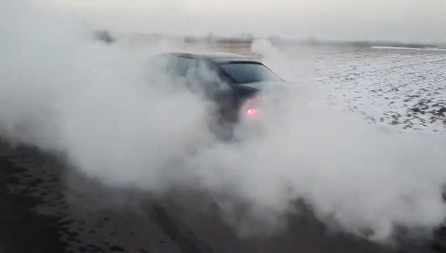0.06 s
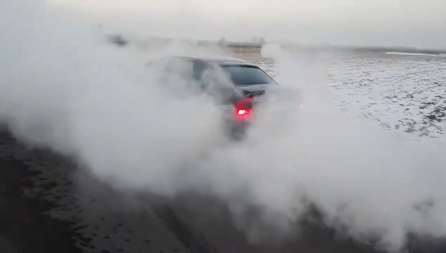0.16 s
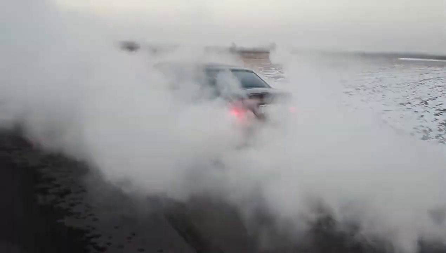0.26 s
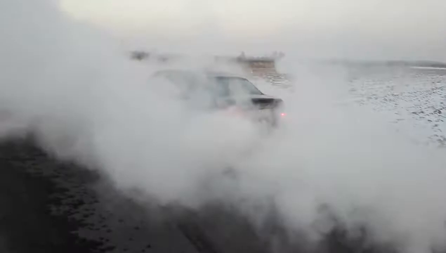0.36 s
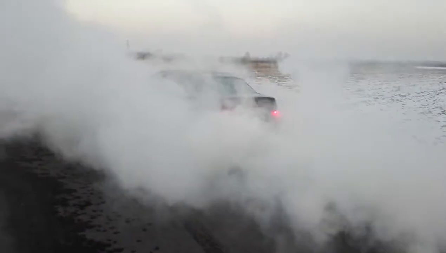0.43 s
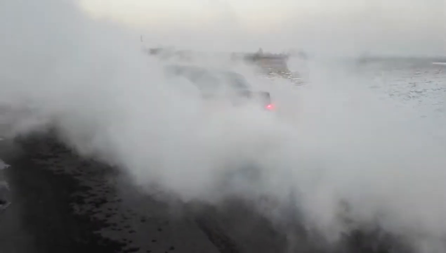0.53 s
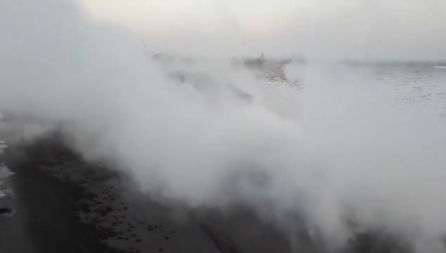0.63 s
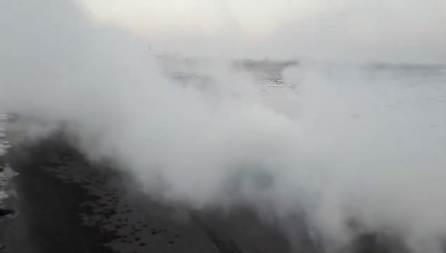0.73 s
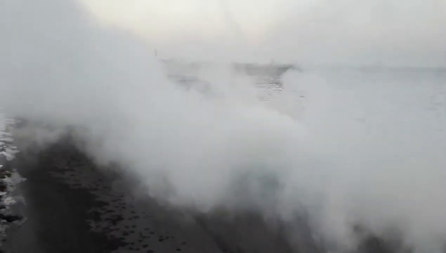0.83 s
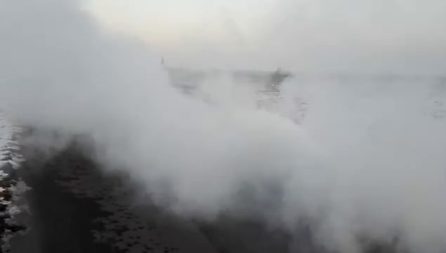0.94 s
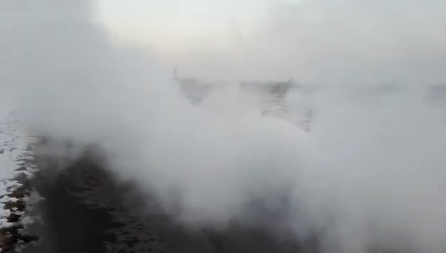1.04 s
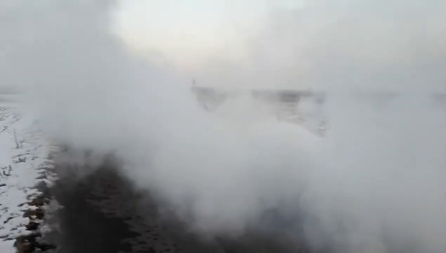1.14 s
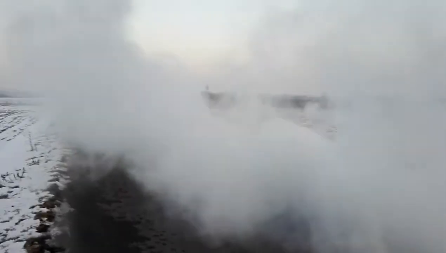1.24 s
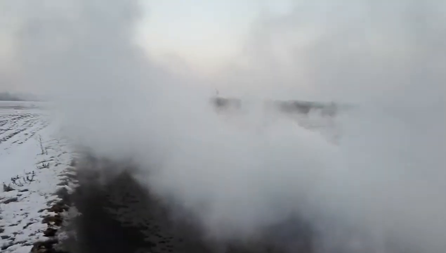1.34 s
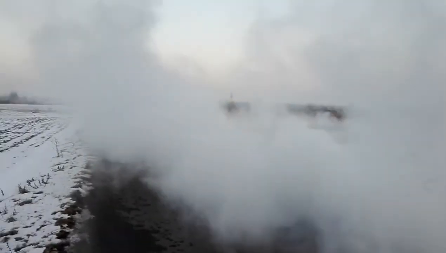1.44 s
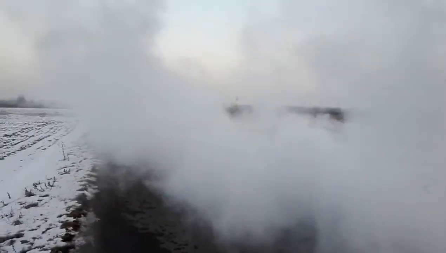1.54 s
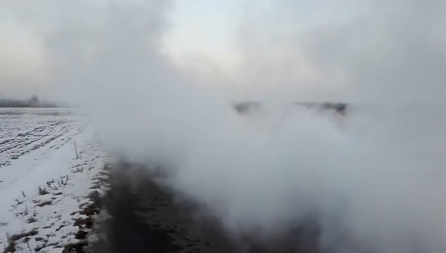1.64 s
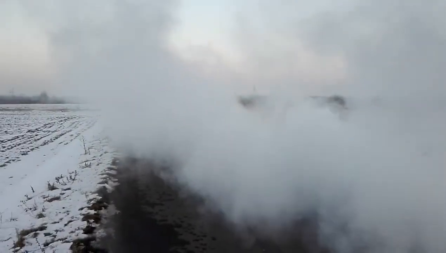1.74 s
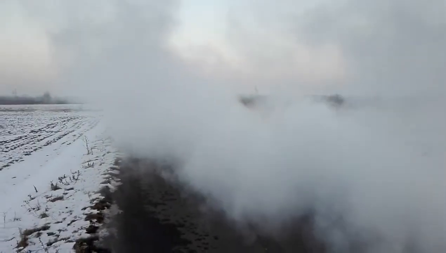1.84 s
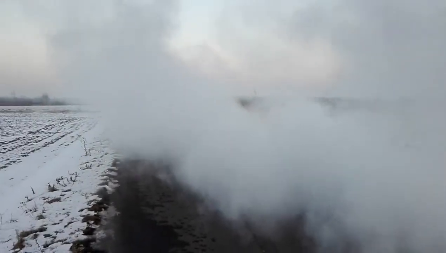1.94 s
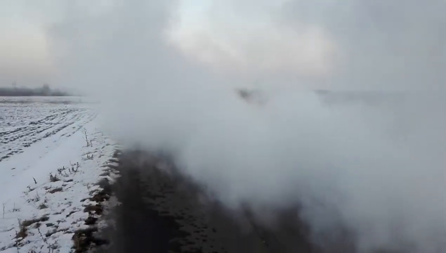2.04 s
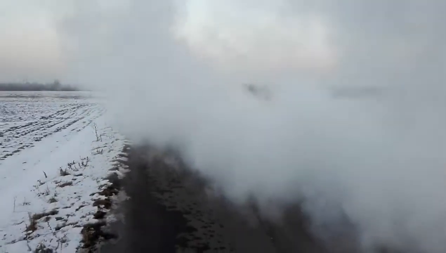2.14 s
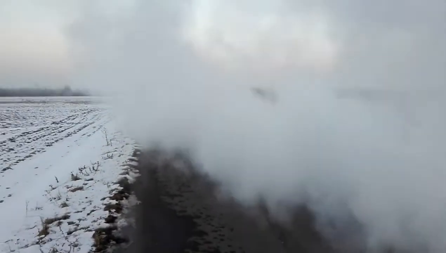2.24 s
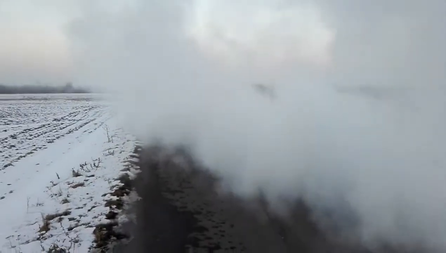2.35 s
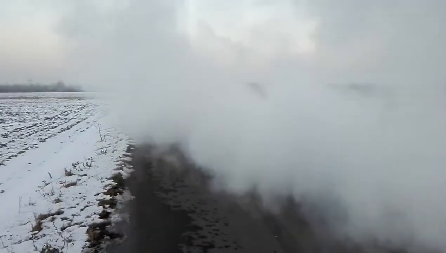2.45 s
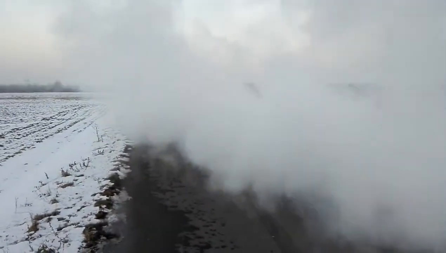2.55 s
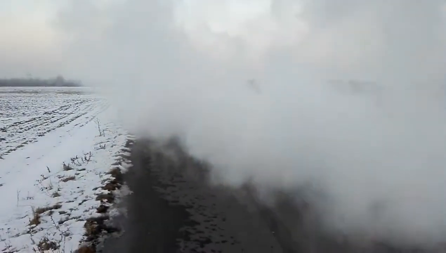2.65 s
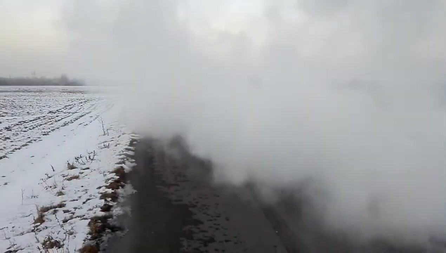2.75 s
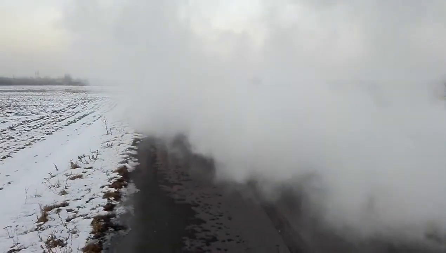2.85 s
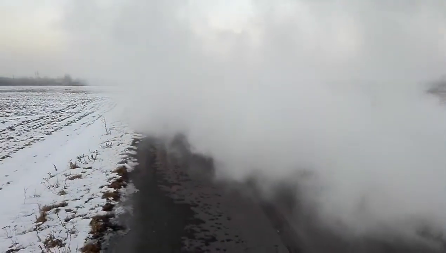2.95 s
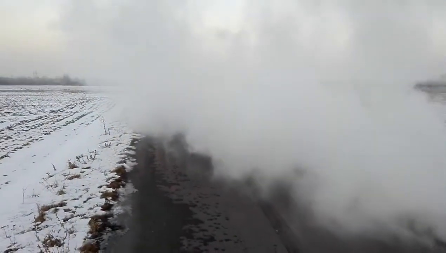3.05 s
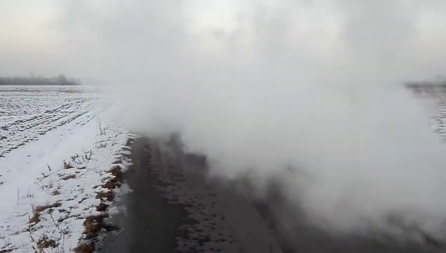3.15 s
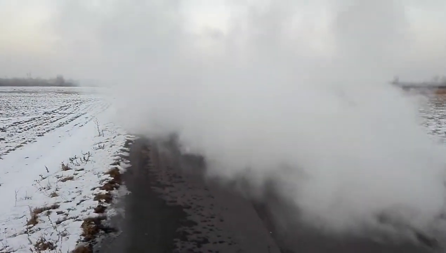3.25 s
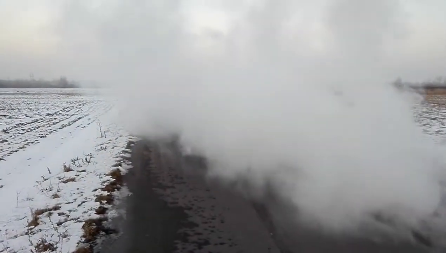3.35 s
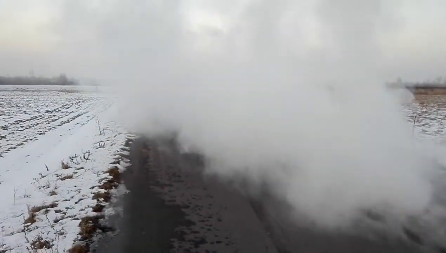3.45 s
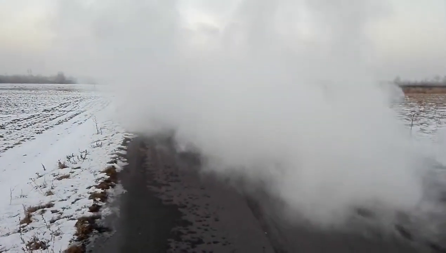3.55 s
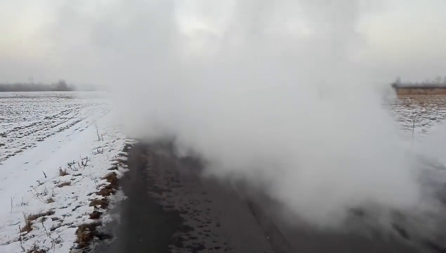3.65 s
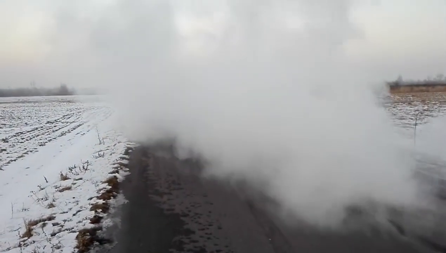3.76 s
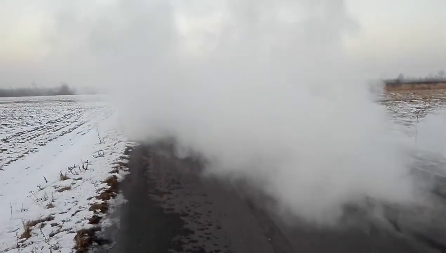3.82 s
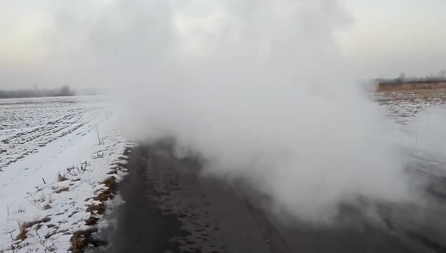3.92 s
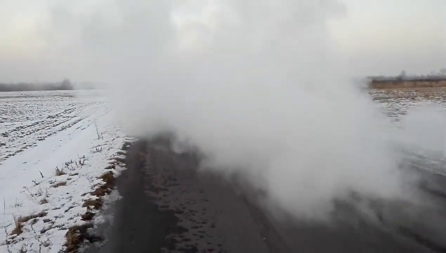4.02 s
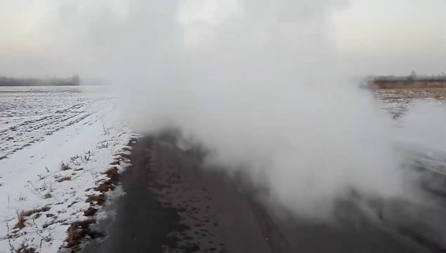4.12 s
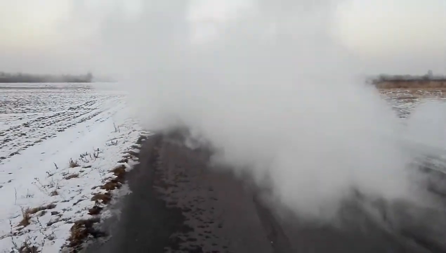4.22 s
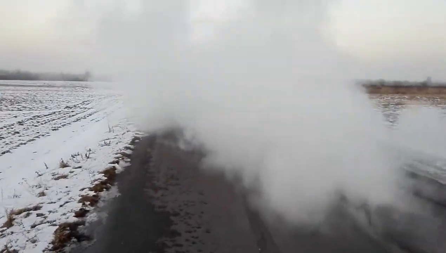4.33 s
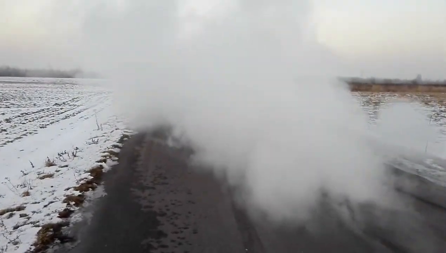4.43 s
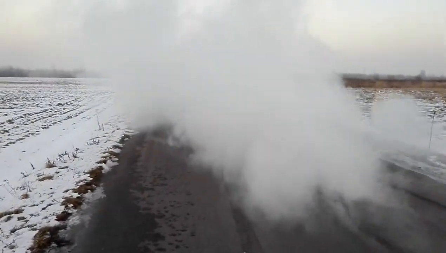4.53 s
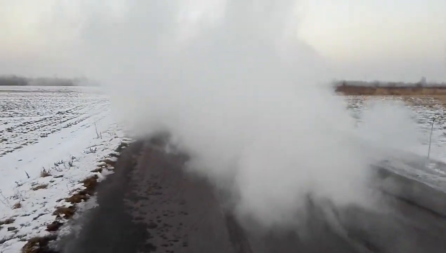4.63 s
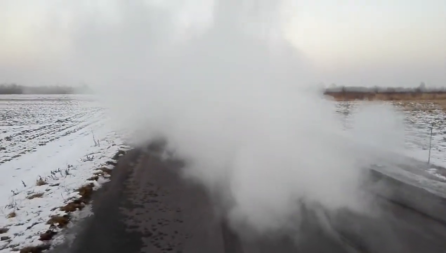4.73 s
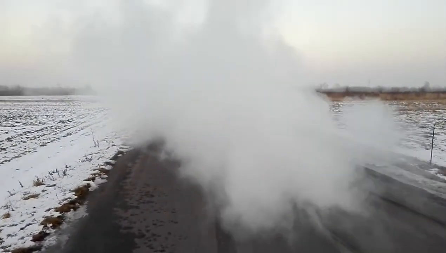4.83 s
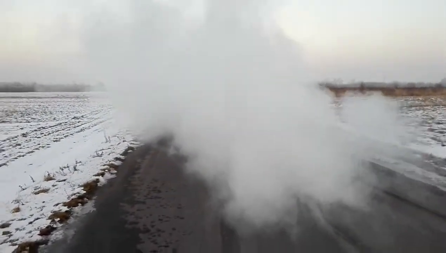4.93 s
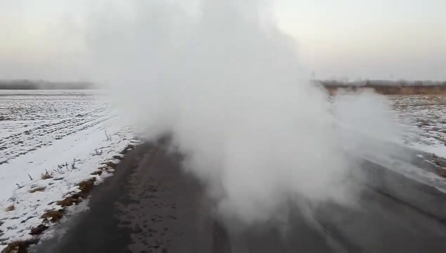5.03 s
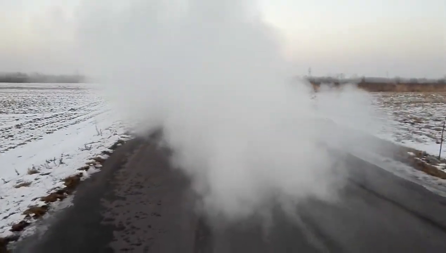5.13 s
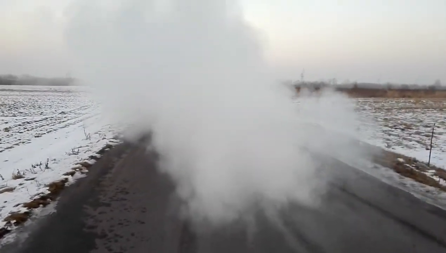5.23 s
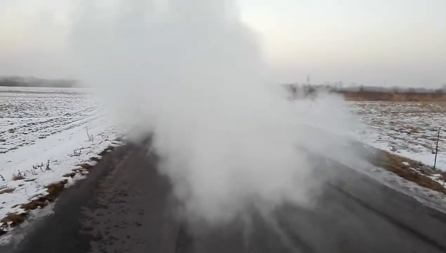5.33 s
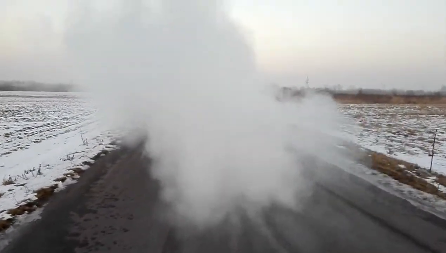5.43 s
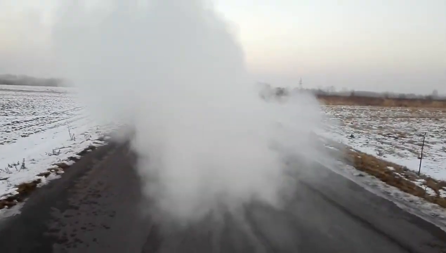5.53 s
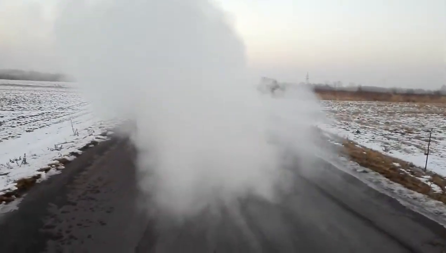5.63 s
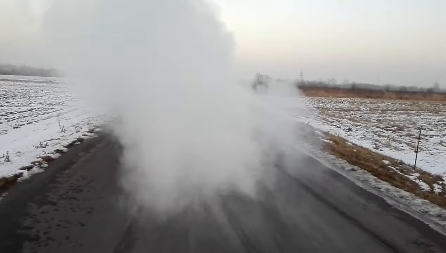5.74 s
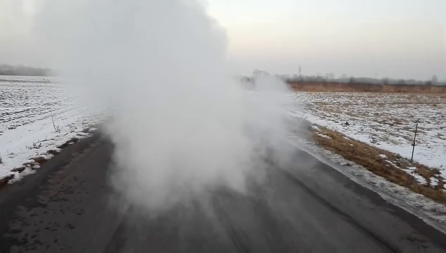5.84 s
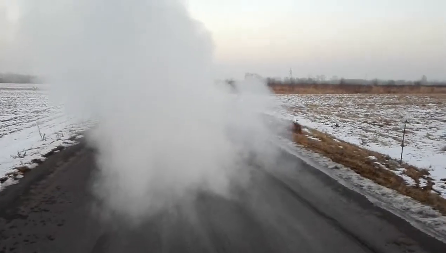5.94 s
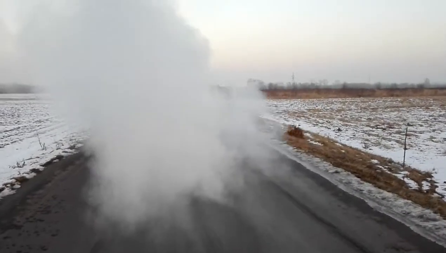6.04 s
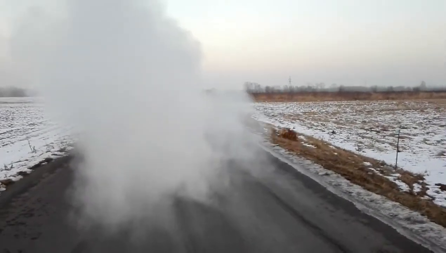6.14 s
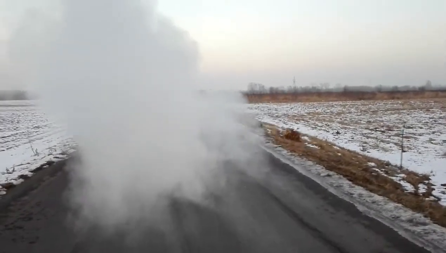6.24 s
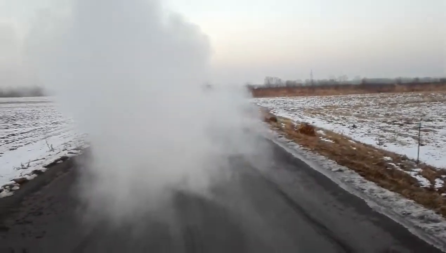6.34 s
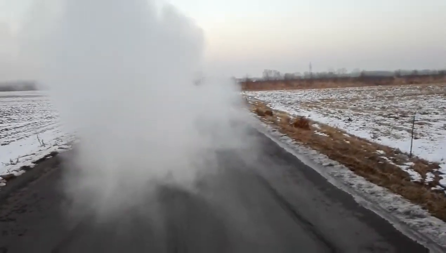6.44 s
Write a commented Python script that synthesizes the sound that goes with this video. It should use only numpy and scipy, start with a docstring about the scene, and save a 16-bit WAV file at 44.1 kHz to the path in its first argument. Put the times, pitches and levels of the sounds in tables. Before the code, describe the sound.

Spinning tyres screech and hiss over a hard-revving car engine, the throttle shuts with thumps, then a skid squeals down to a distant stop.

```python
"""Tyres screech and hiss over a loaded four-cylinder engine as a turbocharged car pulls away on a country road.
The throttle shuts: the exhaust thumps and burbles, the revs sink to idle and grit ticks on the road,
while the skidding tyres squeal and step down in pitch until the car stands, far off, and wind bumps softly.
Engine orders and a gear whine are sines locked to the firing rate; tyre notes are jittered tones in narrow noise;
rubber, rumble, gravel and open air are coloured noise, and distance lowers the car as it leaves."""
import sys
import numpy as np
from scipy import signal
from scipy.fft import rfft, irfft, next_fast_len
from scipy.io import wavfile

SR = 44100
rng = np.random.default_rng(int(sys.argv[2]) if len(sys.argv) > 2 else 0)


def digitize_waveform(pressure):
    """Quantize a signal to 16-bit integers and store it at the path in sys.argv[1].

    Rows of a 2-D input are taken as channels; values are limited to [-1, 1].
    """
    field = np.atleast_2d(pressure).T
    bounded = np.clip(field, -1, 1)
    quanta = np.round(bounded * 32767).astype(np.int16)
    wavfile.write(sys.argv[1], SR, quanta)


N = 285754

# the drive [s]: throttle eases, throttle shuts, wheels stop spinning, idle takes over, car stands
EASE_S, LIFT_S, GRIP_S, IDLE_S, STOP_S = 0.96, 1.92, 2.42, 4.85, 5.15
START_M, TOP_SPEED_M_PER_S = 3.9, 7.35

# engine speed: (time [s], firing rate [firings per s])
FIRING_RATE = [(0.0, 200), (0.16, 196.7), (0.85, 193), (1.04, 189), (1.84, 177.7), (2.18, 152.4),
               (2.65, 133.5), (3.21, 105.4), (3.61, 89.4), (4.06, 63), (4.75, 39), (5.03, 37), (5.54, 37.4),
               (6.48, 40.4)]


def from_db(db):
    """Decibels to gain."""
    return 10 ** (np.asarray(db) / 20)


def rms_one(x):
    """Scale to unit rms."""
    return x / np.sqrt(np.mean(np.abs(x) ** 2) + 1e-20)


def in_time(rows):
    """Each column of a curve, sample by sample."""
    s, *columns = np.transpose(rows)
    return [np.interp(np.arange(N) / SR, s, c) for c in columns]


def during(rows):
    """One while a curve lasts, with 50 ms fades outside it."""
    first_s, last_s = rows[0][0], rows[-1][0]
    return np.interp(np.arange(N) / SR, [first_s - .05, first_s, last_s, last_s + .05], [0, 1, 1, 0])


def after(s, over_s):
    """Rises from 0 to 1 in a straight line centred on a moment."""
    return np.clip((np.arange(N) / SR - s) / over_s + .5, 0, 1)


def swells(rows, attack_s, release_s):
    """Gain of events (start, length, level, ...): each rises, holds and dies away."""
    t = np.arange(N) / SR
    gain = np.zeros(N)
    for s, length, db, *_ in rows:
        release = np.exp(-np.maximum(t - s - length, 0) / release_s)
        gain += from_db(db) * after(s, attack_s) * release
    return gain


def at_hz(points, hz):
    """Read a spectrum on a log-frequency axis."""
    f, value = np.transpose(points)
    return np.interp(np.log(hz + 1e-3), np.log(f), value)


def turning(hz):
    """Phase of something that repeats hz times a second."""
    return 2 * np.pi * np.cumsum(hz) / SR


def drift(rate):
    """Smooth random wander of rms 1: noise low-passed around rate [Hz]."""
    # made at an eighth of the sample rate, then interpolated
    size = next_fast_len(N // 8 + 2)
    hz = np.fft.rfftfreq(size, 8 / SR)
    slow = irfft(rfft(rng.standard_normal(size)) / (1 + (hz / rate) ** 2), size)
    return np.interp(np.arange(N) / 8, np.arange(size), rms_one(slow))


def coloured(x, spectrum):
    """Give a signal a colour that falls steeply past its ends; rms 1."""
    hz = np.fft.rfftfreq(N, 1 / SR)
    low_hz, high_hz = spectrum[0][0], spectrum[-1][0]
    ends = 1 / (1 + (hz / high_hz) ** 8) * (1 - 1 / (1 + (hz / low_hz) ** 8))
    return rms_one(irfft(rfft(x) * ends * from_db(at_hz(spectrum, hz)), N))


def noise(spectrum):
    """Coloured stereo noise whose two sides differ only in the treble; rms 1."""
    # left-right likeness: (frequency [Hz], correlation [share])
    likeness = [(3000, 1.0), (5000, .95), (8000, .72), (12000, .6)]
    alike = np.clip(at_hz(likeness, np.fft.rfftfreq(N, 1 / SR)), 0, 1)
    mid, side = rfft(rng.standard_normal((2, N)))
    stereo = np.sqrt(1 + alike) * mid + np.sqrt(1 - alike) * side * [[1], [-1]]
    return coloured(irfft(stereo, N), spectrum)


def narrow_noise(centre_hz, width_hz):
    """Noise in a narrow band around a moving pitch, from two drifting quadrature carriers; rms near 1."""
    centre = turning(centre_hz)
    return drift(width_hz) * np.cos(centre) + drift(width_hz) * np.sin(centre)


def band(x, low_hz, high_hz):
    """Second-order band-pass."""
    edges_hz = [low_hz, min(high_hz, SR / 2 - 100)]
    return signal.sosfilt(signal.butter(2, edges_hz, "band", fs=SR, output="sos"), x)


def speed():
    """Share of top speed: the car gains until the throttle shuts, then slows to a stand."""
    return np.interp(np.arange(N) / SR, [0, LIFT_S, STOP_S], [0, 1, 0])


def nearness():
    """Gain that falls with the distance driven."""
    return START_M / (START_M + TOP_SPEED_M_PER_S * np.cumsum(speed()) / SR)


def load():
    """One while the throttle is open."""
    return 1 - after(LIFT_S, .12)


def exhaust_and_gears(shake=0.06, weaker_shake=0.14, low_eased_db=-6, high_eased_db_per_octave=-1.5,
                      half_order_db=-9, order_fall_db_per_octave=8, overrun_shake=0.47, overrun_lag_s=0.3,
                      idle_quieter=0.38, ease_over_s=0.068, idle_over_s=0.54):
    """Firing harmonics, with weaker orders between and above them, mostly from unequal cylinders, and a gear whine."""
    # firing harmonics 1 to 3, rms at the starting distance:
    # (full throttle [dB], eased throttle [dB], idling [dB])
    harmonics = [(-18, -17.5, -40), (-33, -42, -28), (-32, -30, -29.5)]
    # weaker orders under load, mostly from unequal cylinders; gear whine near 6.25 times the firing rate:
    # (multiple of the firing rate, full-throttle level against the firing tone [dB])
    weaker_orders = [(.25, -41), (0.504, -9.5), (0.753, -17.5), (1.25, -26.5), (1.502, -20.5), (2.25, -28),
                     (2.5, -31), (2.75, -23.5), (4.001, -25), (4.499, -31.5), (5, -40), (6.247, -18.5)]
    # throttle-shut firing tone at the starting distance, booming as it passes the pipe's resonance:
    # (firing rate [Hz], rms level [dB])
    boom = [(38, -38), (62, -26.5), (85, -25), (102, -17), (118, -18.5), (142, -24), (170, -23)]
    # throttle-shut silencer resonances, before order fall and distance: (frequency [Hz], order level [dB rms])
    silencer = [(35, -42), (70, -35), (130, -37.5), (170, -25.5), (218, -38), (265, -25.5), (330, -45.5),
                (410, -39.5), (475, -23.5), (560, -31.5), (650, -35.5)]

    firing_hz, = in_time(FIRING_RATE)
    loaded, eased, idling = load(), after(EASE_S, ease_over_s), after(IDLE_S, idle_over_s)
    crank = turning(firing_hz)

    boom_gain = (1 - loaded) * (1 - idling) * from_db(at_hz(boom, firing_hz))
    out = boom_gain * (1 + shake * drift(25)) * np.sin(crank)

    for k, (full_db, eased_db, idle_db) in enumerate(harmonics, 1):
        gain = loaded * from_db(full_db + eased * (eased_db - full_db)) + idling * from_db(idle_db)
        out += gain * (1 + shake * drift(42)) * np.sin(k * crank)

    for multiple, level_db in weaker_orders:
        ease_db = low_eased_db if multiple < 1 else high_eased_db_per_octave * np.log2(multiple)
        gain = loaded * from_db(harmonics[0][0] + level_db + eased * ease_db)
        phase = rng.uniform(0, 2 * np.pi)
        out += gain * (1 + weaker_shake * drift(45)) * np.sin(multiple * crank + phase)

    # off the throttle, whole and half orders slide down through the silencer's resonances
    overrun = after(LIFT_S + overrun_lag_s, 2 * overrun_lag_s) * (1 - idle_quieter * idling)
    for multiple in np.setdiff1d(np.arange(1, 13) / 2, [1]):
        level_db = at_hz(silencer, multiple * firing_hz)
        level_db = level_db - order_fall_db_per_octave * np.log2(max(multiple, 1))
        if multiple % 1:
            level_db = level_db + half_order_db
        phase = rng.uniform(0, 2 * np.pi)
        order = (1 + overrun_shake * drift(21)) * np.sin(multiple * crank + phase)
        out += overrun * from_db(level_db) * order
    return np.sqrt(2) * nearness() * out


def rumble(attack_s=0.087, release_s=0.17, load_db=-45, steady_db=-53.5):
    """Low coloured noise: stronger under load, over a steady bed with a few swells."""
    # relative colour: (frequency [Hz], level [dB per Hz])
    rumble_colour = [(20, -17.5), (45, -0.5), (90, 2.5), (160, -2), (215, -10), (260, -8), (340, -22),
                     (600, -34.5)]
    # (start [s], length [s], level [dB])
    rumble_swells = [(1.98, 0.39, -37.5), (2.5, .6, -57), (4.05, 0.54, -51.5), (6.15, 0.35, -49.5)]
    loaded = from_db(load_db) * load() * nearness()
    moving = np.hypot(loaded, swells(rumble_swells, attack_s, release_s))
    return np.hypot(moving, from_db(steady_db)) * noise(rumble_colour)


def turbo(jitter=0.005):
    """A thin jittering sine, the whistle that winds down when the throttle shuts."""
    # (time [s], pitch [Hz], rms level [dB])
    whistle = [(0, 7400, -60), (1.3, 7130, -68), (1.7, 6966, -62.5), (1.95, 7200, -71), (2.3, 6560, -77)]
    hz, level_db = in_time(whistle)
    tone = np.sqrt(2) * np.sin(turning(hz * (1 + jitter * drift(150))))
    return during(whistle) * from_db(level_db) * tone


def tyre_tone(pitch_hz, jitter, second_db, third_db, flutter_db, jitter_rate=130, flutter_rate=150,
              hoarse=0.63, hoarse_width_hz=90):
    """Tread blocks stick and slip at an unsteady rate; they let go out of step, which smears the overtones."""
    slip = turning(pitch_hz * (1 + jitter * drift(jitter_rate)))
    wave = np.sin(slip)
    for k, level_db in ((2, second_db), (3, third_db)):
        smear = rms_one(1 + hoarse * (drift(hoarse_width_hz) + 1j * drift(hoarse_width_hz)))
        wave += from_db(level_db) * np.imag(smear * np.exp(1j * k * slip))
    flutter = rms_one(from_db(flutter_db * np.minimum(drift(flutter_rate), 1.5)))
    return np.sqrt(2) * wave * flutter


def two_tyres(pitch_hz, jitter, other_db, chatter_db, second_db, third_db, flutter_db, surge_db,
              second_ratio, second_jitter, chatter_ratio, chatter_width_hz, far_dull_db):
    """Two tyres sing at different pitches and beat; loose chatter of the tread surrounds them."""
    first = tyre_tone(pitch_hz, jitter, second_db, third_db, flutter_db)
    # the body screens the overtones of the far tyre
    other = tyre_tone(pitch_hz * second_ratio, second_jitter,
                      second_db + far_dull_db, third_db + far_dull_db, flutter_db)
    chatter = narrow_noise(pitch_hz * chatter_ratio, chatter_width_hz)
    chatter = rms_one(band(chatter, 1150, 1695))
    total = np.sqrt(1 + from_db(2 * other_db) + from_db(2 * chatter_db))
    mix = (first + from_db(other_db) * other + from_db(chatter_db) * chatter) / total
    # the rubber catches and lets go on patches of the road, a few dozen times a second
    patches = rms_one(band(drift(54), 14, 46))
    return from_db(surge_db * patches) * mix


def screech(pitch_hz=1524, level_db=-23, end_s=1.73, fade_s=0.37):
    """The hoarse, nearly toneless voice of the spinning tyres: chatter outweighs the tones."""
    voice = two_tyres(np.full(N, pitch_hz), jitter=.05, other_db=-3.5, chatter_db=8.5,
                      second_db=-25.5, third_db=-33, flutter_db=4.5, surge_db=2.0,
                      second_ratio=.92, second_jitter=.045, chatter_ratio=1.0,
                      chatter_width_hz=280, far_dull_db=-3)
    return nearness() * (1 - after(end_s, fade_s)) * from_db(level_db) * voice


def wheel_throb(firings_per_wheel_turn=10):
    """A spinning tyre presses unevenly on the road, once, twice and three times a turn."""
    wheel = turning(in_time(FIRING_RATE)[0] / firings_per_wheel_turn)
    return load() * (2.0 * np.sin(wheel) + np.sin(2 * wheel) + 0.3 * np.cos(3 * wheel))


def scrub(throb_db=-0.24, patchy_db=0.6):
    """Rubber roars and hisses on the road as it spins, rolls and finally slides, each band fading its own way."""
    # relative colours of the three bands: (frequency [Hz], level [dB per Hz])
    roar = [(300, -12.5), (600, -14), (850, -8), (1050, -2), (1500, 0.5), (1820, 2), (2020, -7.5),
            (2280, -10), (2600, -11.5), (3600, -18)]
    hiss = [(1800, -14.5), (2300, 3.5), (2580, -21.5), (3050, -5), (3370, -6), (3700, -5), (4300, 1.5),
            (5200, 2.5), (5900, -5), (6500, -19.5), (7800, -18), (9000, -32)]
    sizzle = [(6400, -4.5), (7400, 2), (8100, -1), (9400, -18), (11500, -8.5), (12900, -15.5), (13700, -10),
              (16000, -5.5)]
    # growth of roar, hiss, sizzle: (wheel slip [power], nearness [power], sliding speed [power])
    powers = [(1.1, 1.57, 0.76), (1.6, 0.99, 0.029), (0.49, 2.18, 0.47)]
    # sliding rubber, before the band offsets and speed: (time [s], level [dB])
    slide_level = [(2.75, -72), (2.97, -52.5), (3.53, -49), (3.73, -46), (4.39, -52), (4.61, -50.5),
                   (5.03, -61), (5.22, -90)]
    # roar, hiss, sizzle [dB]: spinning and rolling before slip, distance and speed; sliding against its curve
    spin_db, roll_db, slide_db = (-24, -25, -34.5), (-40, -48, -62.5), (13, 1, -18.5)

    slip = np.maximum(1 - (np.arange(N) / SR / GRIP_S) ** 2, 0)
    near, pace = nearness(), speed()
    slide = during(slide_level) * from_db(in_time(slide_level)[0])
    out = 0
    for k, spectrum in enumerate((roar, hiss, sizzle)):
        slip_power, near_power, pace_power = powers[k]
        spinning = from_db(spin_db[k]) * slip ** slip_power * near ** near_power
        sliding = from_db(slide_db[k]) * slide * pace ** pace_power
        rolling = from_db(roll_db[k]) * near * pace
        out = out + np.hypot(spinning + sliding, rolling) * noise(spectrum)
    return out * from_db(throb_db * wheel_throb() + patchy_db * drift(40))


def open_air(level_db=-68):
    """Faint steady background of coloured noise."""
    # relative colour: (frequency [Hz], level [dB per Hz])
    air_colour = [(300, 1.5), (700, -2.5), (1600, -3.5), (2600, -14.5), (3600, -17.5), (5300, -8.5),
                  (6600, -18), (14000, -19)]
    return from_db(level_db) * noise(air_colour)


def catches(attack_s=0.013, release_s=0.018, jitter=0.026, wander=.011, twelfth_db=12):
    """Tread catches and sings short clear squeals; in a hard catch the twelfth grows twice as fast as the octave."""
    # (start [s], length [s], level [dB], pitch [Hz], octave against the pitch [dB])
    squeals = [(0.047, 0.034, -20, 1587, -23), (0.335, 0.045, -16, 1540, -26),
               (0.452, 0.044, -18, 1520, -29), (0.661, 0.063, -22, 1566, -8),
               (0.748, 0.098, -15, 1530, -10), (0.885, 0.061, -20, 1562, -7),
               (0.96, 0.041, -15.5, 1586, -12), (1.075, .025, -23, 1537, -20),
               (1.177, 0.0473, -20, 1577, -14), (1.336, 0.024, -21, 1509, -21),
               (1.411, 0.0362, -26.5, 1506, -15), (1.517, 0.03, -23.5, 1550, -20),
               (1.595, 0.048, -21, 1517, -26)]
    path = []
    for s, length, _, hz, db in squeals:
        path += [(s, hz, db), (s + length, hz, db)]
    pitch_hz, octave_db = in_time(path)
    voice = tyre_tone(pitch_hz * (1 + wander * drift(22)), jitter, octave_db,
                      twelfth_db + 2 * octave_db, flutter_db=3.5, hoarse=0.48, hoarse_width_hz=82)
    return swells(squeals, attack_s, release_s) * voice


def thumps(rise_s=0.0033):
    """Dull low thumps: sines whose pressure swells and dies within a cycle or two."""
    # exhaust puffs as the throttle shuts, a few stragglers, then wind bumps at the end:
    # (time [s], envelope peak [dB], pitch [Hz])
    low_thumps = [(1.979, -25, 86), (2.009, -23, 76), (2.125, -29, 97.2), (2.155, -42, 70),
                  (2.232, -36, 80), (2.319, -37, 75.1), (2.393, -26.5, 84.7), (4.94, -35.5, 59.38),
                  (5.208, -34.5, 59.7), (6.14, -32, 45.14), (6.179, -33, 49.8), (6.285, -32.5, 131.1),
                  (6.312, -30.5, 164)]
    out = np.zeros(N)
    for s, peak_db, hz in low_thumps:
        age = np.maximum(np.arange(N) / SR - s, 0)
        envelope = age / rise_s * np.exp(1 - age / rise_s)
        out += from_db(peak_db) * envelope * np.sin(2 * np.pi * hz * age)
    return out


def grit(tick_s=0.0014, grains_per_s=900, ticks_db=-2.0):
    """Single stones tick as short noise bursts; fine crunches are showers of random grains."""
    # sharp ticks: (time [s], peak before the common trim [dB], pitch [Hz])
    stones = [(2.243, -29.5, 6860), (4.58, -43, 7540), (5.445, -45.5, 1992), (5.544, -45, 6980),
              (5.65, -48.5, 1300), (5.691, -50.5, 2282), (5.71, -54, 2600), (5.895, -48.5, 2205),
              (5.972, -46.5, 2015), (5.988, -55, 1722), (6.108, -51.5, 5470)]
    # (start [s], length [s], level [dB])
    crunches = [(5.68, .04, -63), (5.85, .08, -63), (6.08, .08, -68), (5.75, .7, -73)]
    # relative colour of the crunch: (frequency [Hz], level [dB per Hz])
    gravel = [(900, 4), (1900, 5.5), (3100, 0.5), (3700, -12), (5300, 4), (6800, -16), (12000, -19.5)]
    out, age = np.zeros(N), np.arange(SR // 20) / SR
    for s, peak_db, hz in stones:
        burst = rng.standard_normal(len(age)) * np.exp(-age / tick_s)
        tick = band(burst, hz / 1.7, hz * 1.13)
        start = round(s * SR)
        out[start:start + len(age)] += from_db(peak_db + ticks_db) * tick / np.abs(tick).max()
    grains = (rng.random(N) < grains_per_s / SR) * rng.standard_normal(N)
    return out + swells(crunches, attack_s=0.018, release_s=0.033) * coloured(grains, gravel)


def skid(trim_db=0.56, chatter_hz=1340, wander=.009, rasp_ratio=2.15, rasp_width_hz=230,
         unsettled_dull_db=5, unsettled_jitter=0.736, last_chirp_s=0.052, last_chirp_share=0.08):
    """The braked tyres squeal and rasp, breaking to a lower note twice as the car slows."""
    # squeal before the common trim: (time [s], level [dB])
    squeal_level = [(2.55, -57.5), (2.95, -28), (3.25, -26), (3.6, -36), (4.13, -27.5), (4.16, -31.5),
                    (4.67, -28), (4.85, -33.5), (4.88, -30.5), (5.14, -47.5), (5.16, -64), (5.22, -68)]
    # each squeal starts off pitch and settles: (start [s], first pitch [Hz], settled pitch [Hz],
    # settling time [s], settled jitter [share], second tyre [dB], chatter [dB],
    # settled octave [dB], settled twelfth [dB], settled rasp [dB])
    skid_notes = [(2.55, 1270, 1485, 0.78, 0.01527, -2, -2, -14.5, -29, -28),
                  (3.84, 1286, 1089, .085, 0.01223, -7.5, -5.5, -9.5, -23, -20.5),
                  (4.35, 1014, 1078, 0.065, .010, -7, -5, -16, -24, -17)]
    t, notes = np.arange(N) / SR, np.array(skid_notes)
    current = np.maximum(np.searchsorted(notes[:, 0], t) - 1, 0)
    (start, first_hz, settled_hz, settle_s, jitter,
     other_db, chatter_db, second_db, third_db, rasp_db) = notes[current].T
    unsettled = np.exp(-np.maximum(t - start, 0) / settle_s)
    # the pitch lifts as the car comes to rest
    chirp = last_chirp_share * after(STOP_S - last_chirp_s / 2, last_chirp_s)
    settling_hz = settled_hz + (first_hz - settled_hz) * unsettled
    pitch_hz = settling_hz * (1 + chirp + wander * drift(8.8))
    # until it settles a squeal has weaker overtones and more jitter
    dull_db = unsettled_dull_db * np.sqrt(unsettled)
    voice = two_tyres(pitch_hz, jitter * (1 + unsettled_jitter * unsettled), other_db, chatter_db,
                      second_db - dull_db, third_db - dull_db, flutter_db=1.7, surge_db=2.0,
                      second_ratio=1.11, second_jitter=.026, chatter_ratio=chatter_hz / pitch_hz,
                      chatter_width_hz=254, far_dull_db=-3.5)
    rasp = from_db(rasp_db - dull_db) * narrow_noise(rasp_ratio * pitch_hz, rasp_width_hz)
    gain = during(squeal_level) * from_db(in_time(squeal_level)[0] + trim_db)
    return gain * (voice + rasp)


def scene():
    """Engine, tyres, road and wind, all straight ahead in open country."""
    engine = exhaust_and_gears() + rumble() + turbo()
    tyres = screech() + scrub() + catches() + skid()
    return engine + tyres + thumps() + grit() + open_air()


def record(dry, cutoff_hz=14300):
    """The top is cut steeply by an elliptic low-pass."""
    return signal.sosfilt(signal.ellip(12, .1, 90, cutoff_hz, fs=SR, output="sos"), dry)


dry = scene()
out = record(dry)
digitize_waveform(out)
```